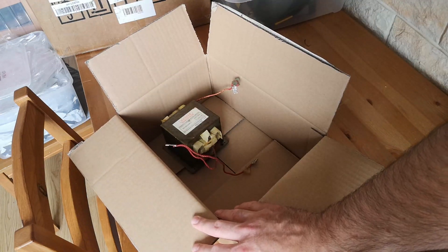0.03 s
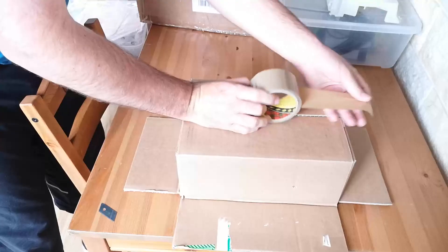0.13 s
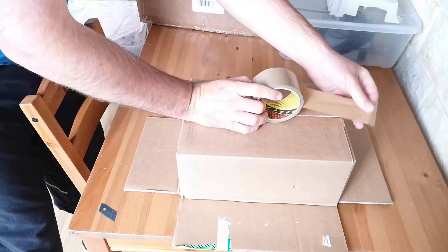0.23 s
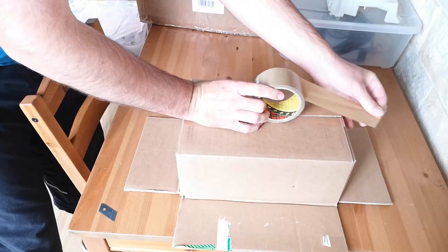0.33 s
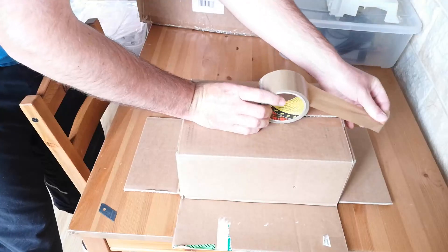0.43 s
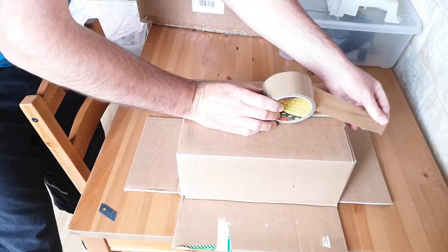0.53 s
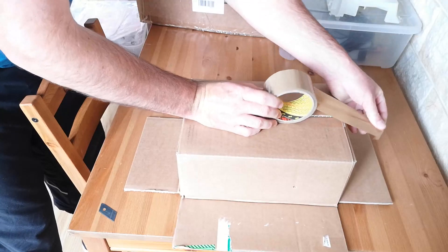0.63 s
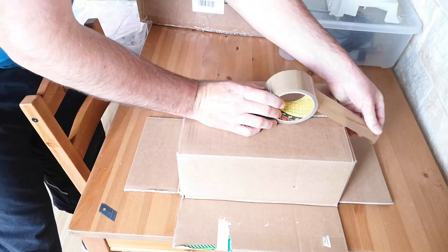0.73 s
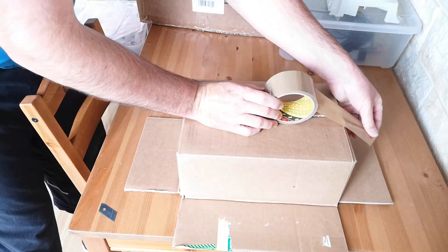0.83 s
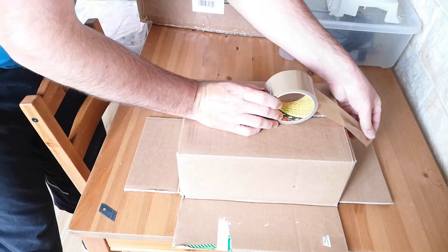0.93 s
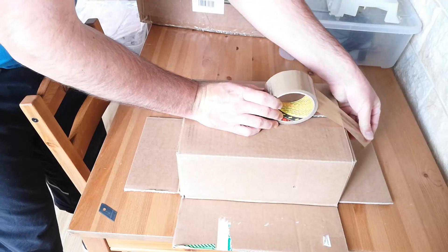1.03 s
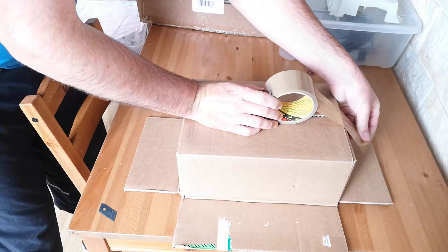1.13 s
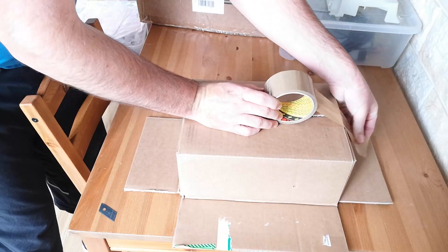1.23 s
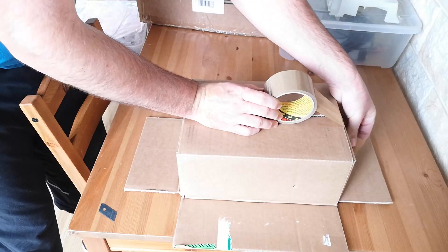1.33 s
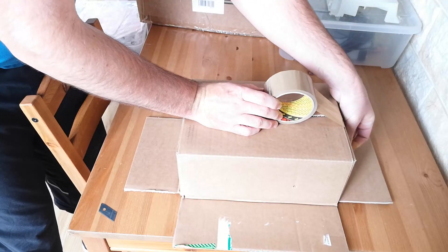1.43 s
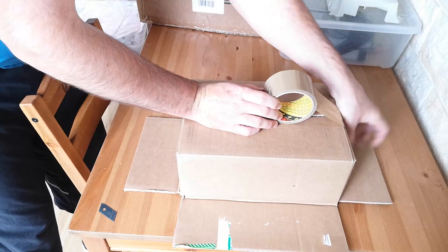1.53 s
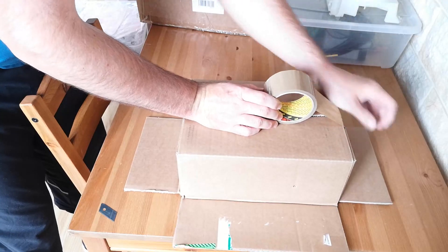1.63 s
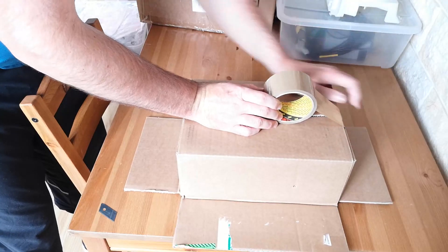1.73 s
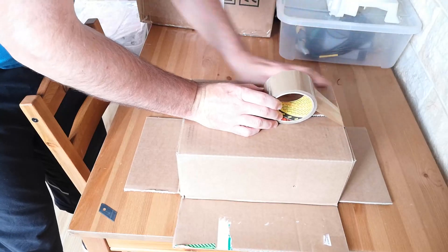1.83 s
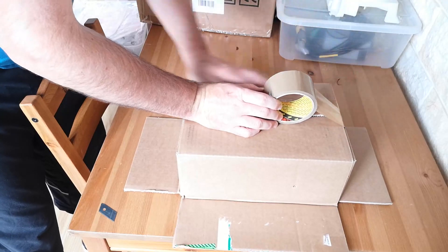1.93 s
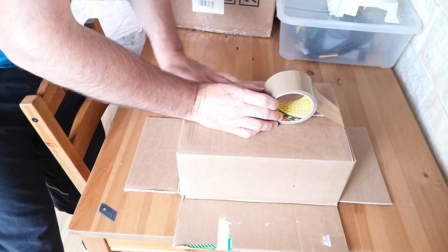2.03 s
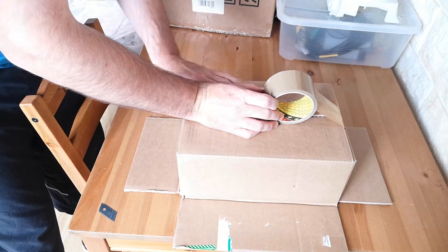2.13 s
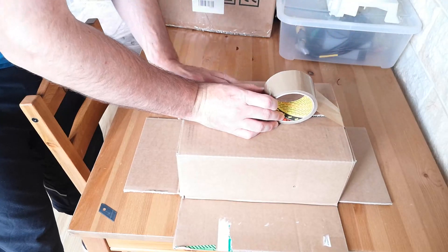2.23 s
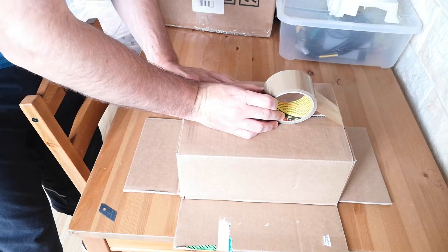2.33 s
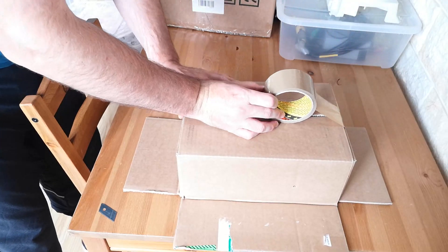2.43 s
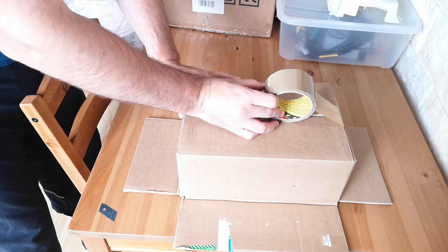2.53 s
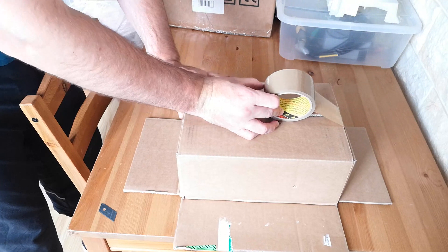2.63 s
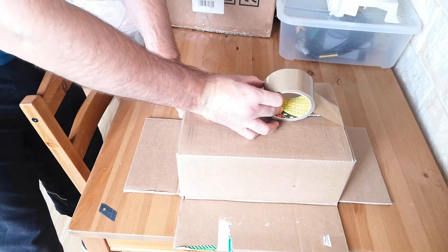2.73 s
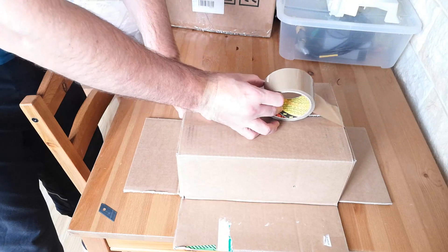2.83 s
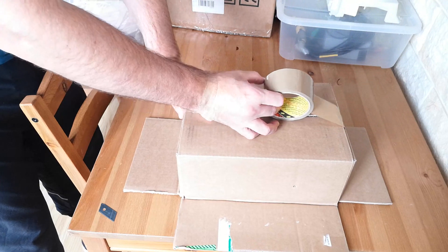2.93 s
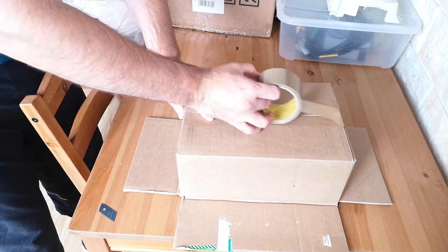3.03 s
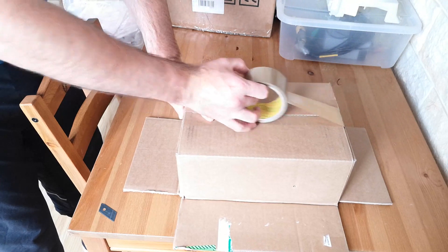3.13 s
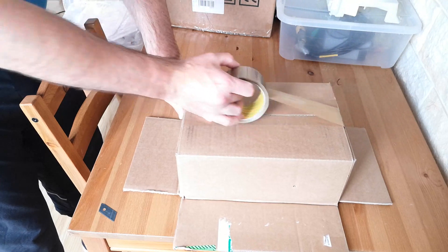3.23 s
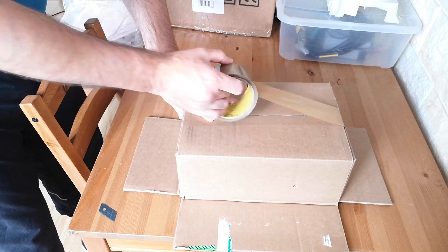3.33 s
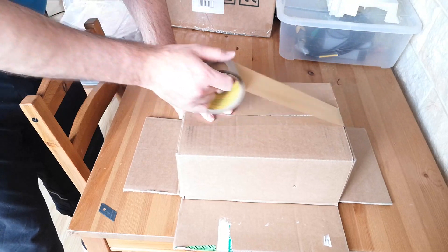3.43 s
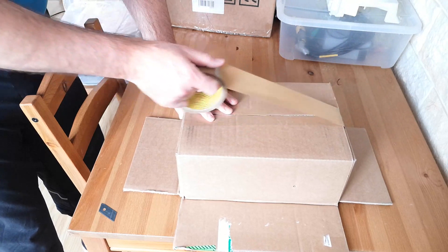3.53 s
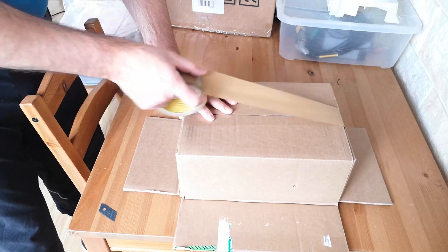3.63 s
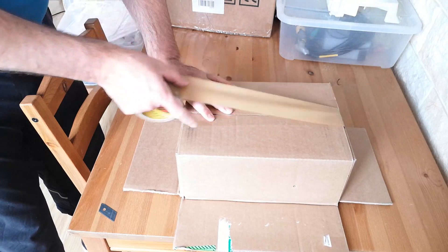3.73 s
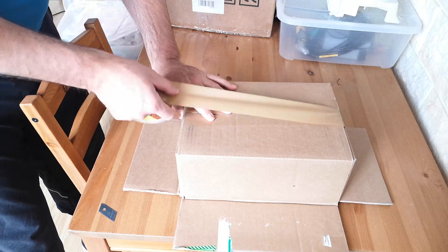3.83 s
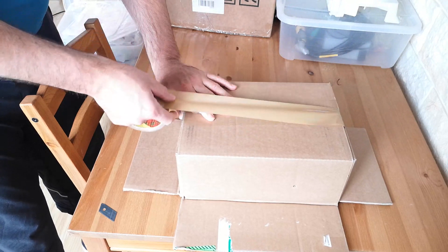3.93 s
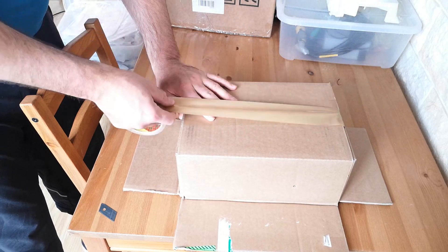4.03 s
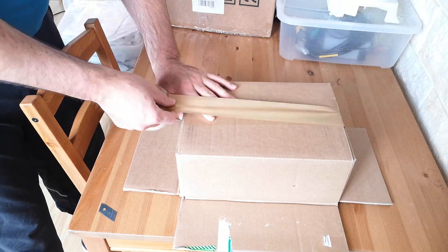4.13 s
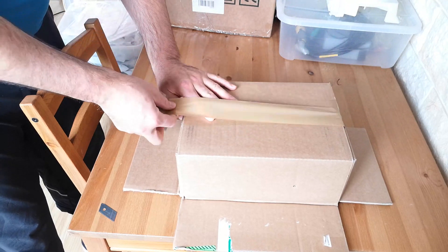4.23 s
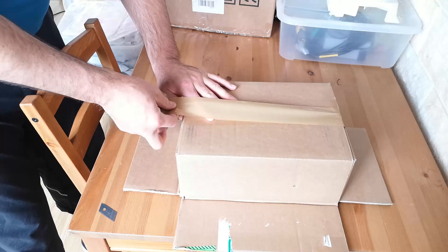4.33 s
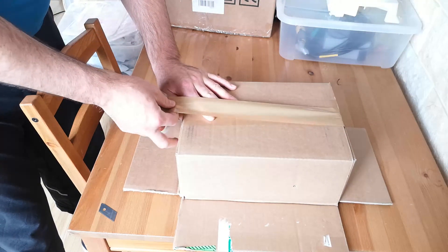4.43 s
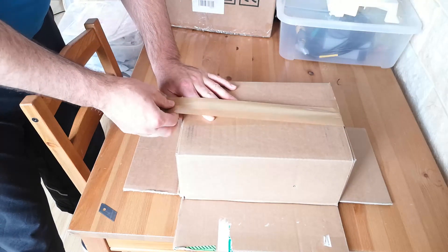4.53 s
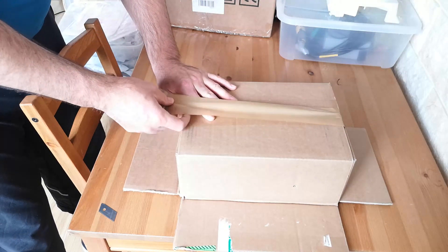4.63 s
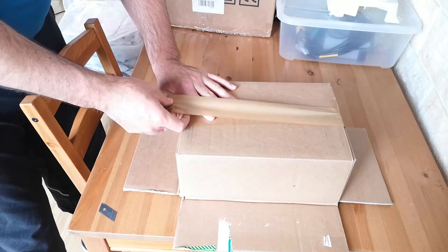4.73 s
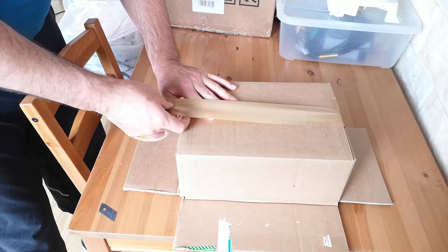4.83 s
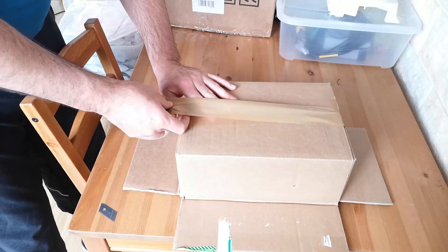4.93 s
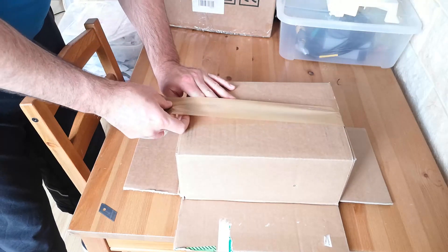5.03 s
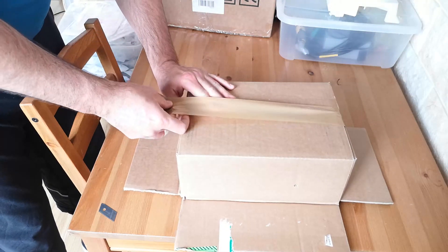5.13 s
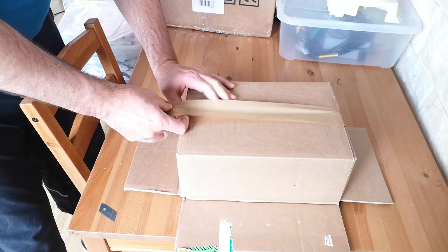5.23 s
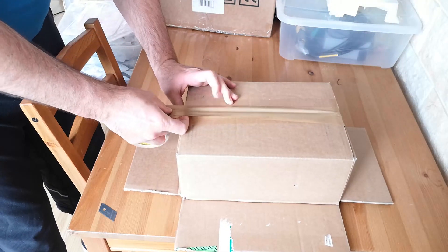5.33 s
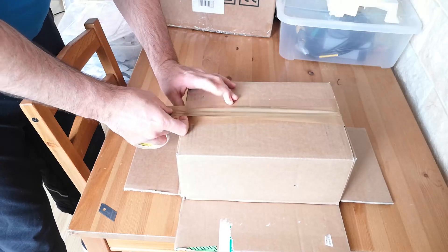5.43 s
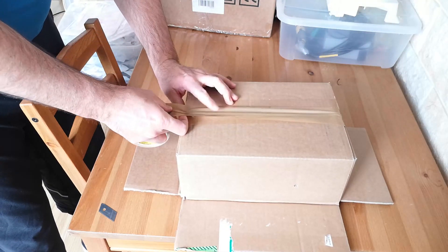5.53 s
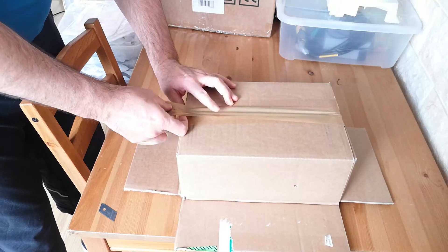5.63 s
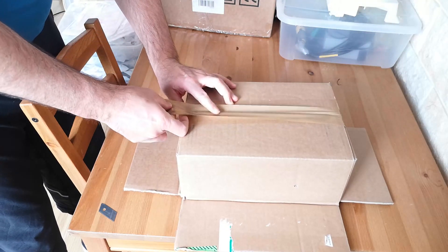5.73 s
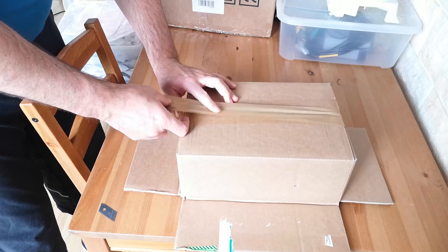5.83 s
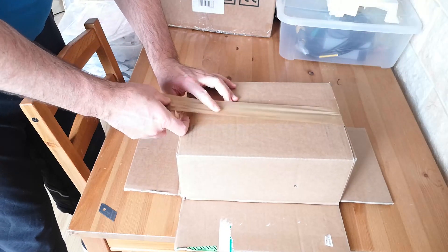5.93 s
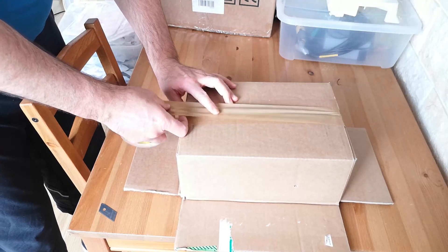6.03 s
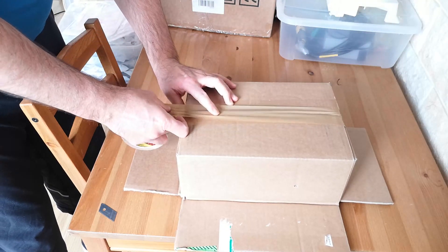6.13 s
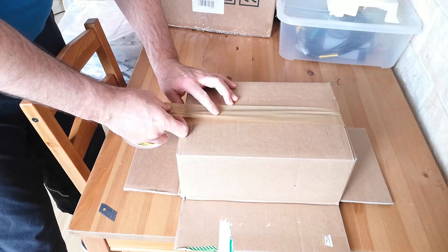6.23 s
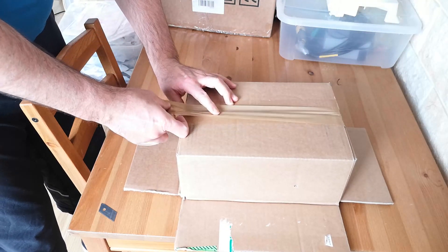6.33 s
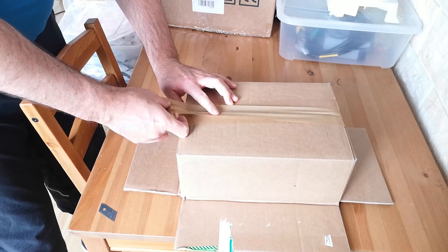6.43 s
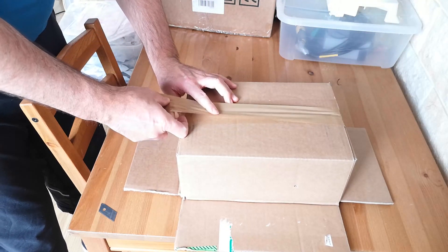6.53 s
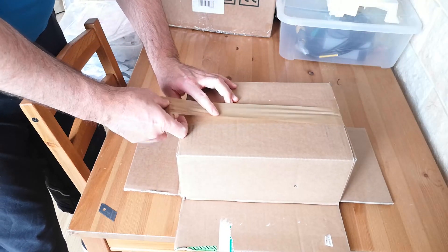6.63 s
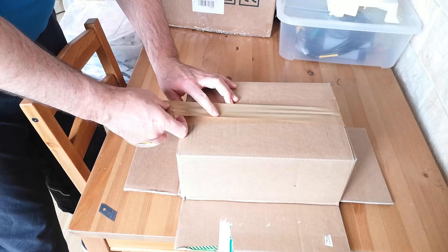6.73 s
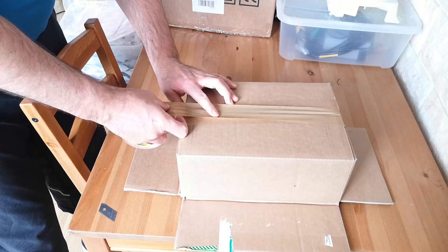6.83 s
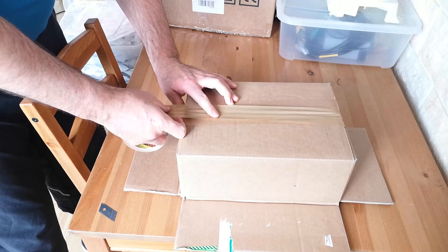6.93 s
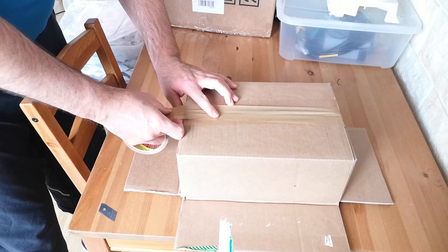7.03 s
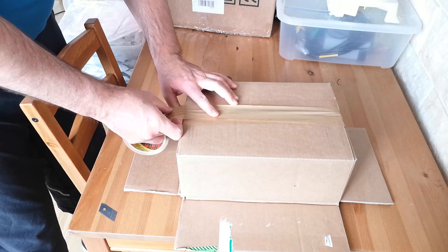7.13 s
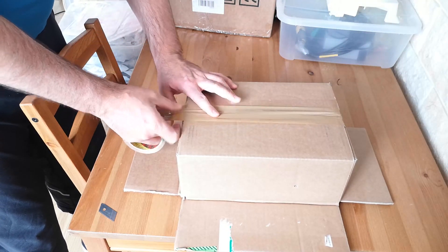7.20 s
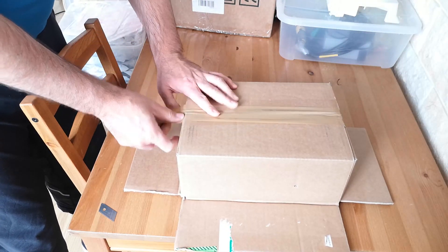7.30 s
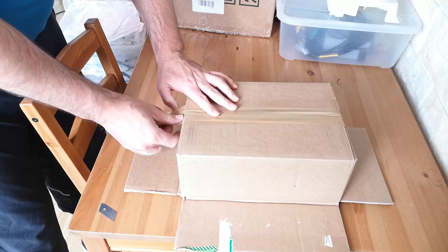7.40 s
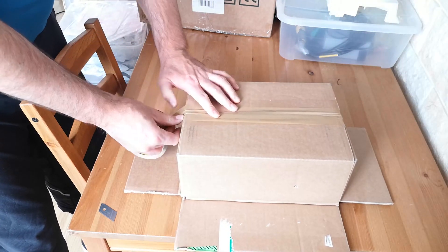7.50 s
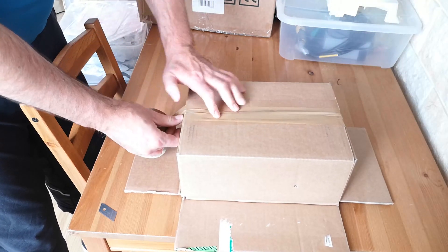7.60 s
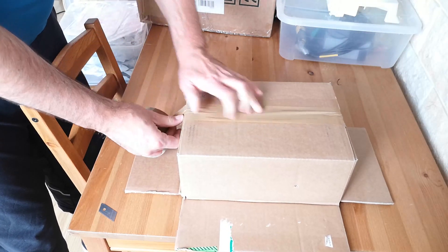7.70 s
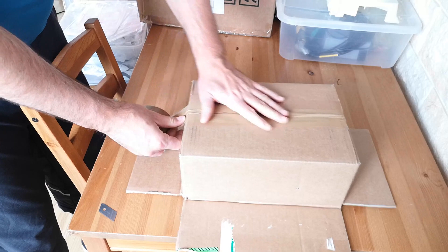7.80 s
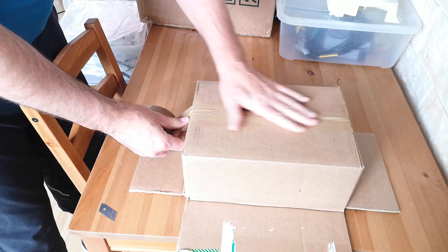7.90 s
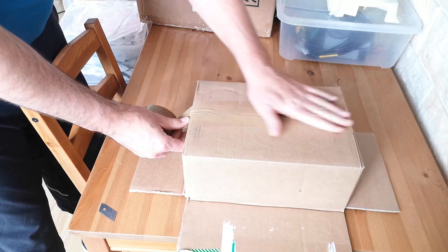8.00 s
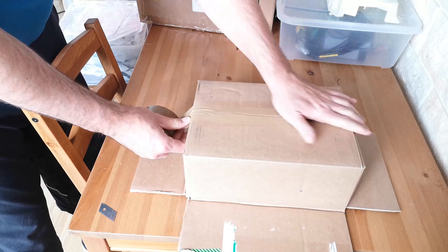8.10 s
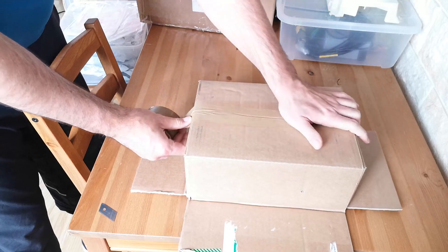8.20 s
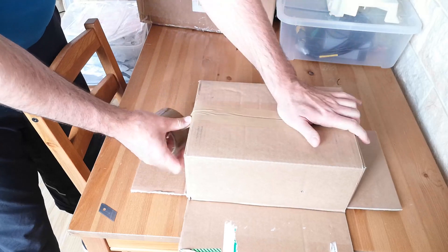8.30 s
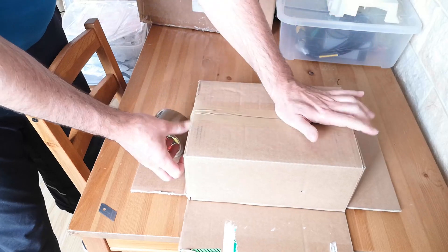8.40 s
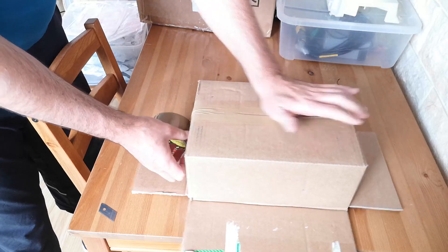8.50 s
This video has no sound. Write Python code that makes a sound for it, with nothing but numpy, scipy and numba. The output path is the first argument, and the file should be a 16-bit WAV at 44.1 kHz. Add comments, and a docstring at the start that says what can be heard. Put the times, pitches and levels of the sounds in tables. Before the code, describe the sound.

In a small, quiet, hard-walled room, packing tape jerks off its roll in short bright rips, then after a lull of rubbing and small knocks comes one long harsh, juddering peel of nearly a second. Crackling snaps follow as it is pressed onto a hollow cardboard box, with a fingertip squeak, thumps, another short rip and soft palm sweeps. Close microphone.

```python
"""Packing tape is pulled off its roll and pressed onto a cardboard box on a wooden table, in a small room.
The glue lets go by stick-slip: trains of tiny slips make the taut film sizzle, the card rattle and the
hollow box boom. Knocks ring the box's modes, a fingertip stutters and groans along the tape, and
friction noise is heard as a palm sweeps over the lid and the box shuffles on the table."""
import sys
import numpy as np
from scipy import signal
from scipy.fft import rfft, irfft
from scipy.io import wavfile
from scipy.ndimage import uniform_filter1d
from numba import njit

SR = 44100
rng = np.random.default_rng(int(sys.argv[2]) if len(sys.argv) > 2 else 0)


def bounce(signal):
    """Save signal as a 16-bit WAV file at the path given by the first command-line argument."""
    frames = np.transpose(np.atleast_2d(signal))
    limited = np.clip(frames, -1, 1)
    pcm = np.round(limited * 32767).astype(np.int16)
    wavfile.write(sys.argv[1], SR, pcm)


N = 377496
TIME = np.arange(N) / SR


def undb(db):
    """Definition of the decibel: level to amplitude gain."""
    return 10 ** (np.asarray(db) / 20)


def unit(x):
    """Normalisation to an rms of 1."""
    return x / np.sqrt(np.mean(x ** 2) + 1e-30)


def with_energy(x, db, seconds):
    """Equal energy: scale x to the energy of a sound that holds this level for so long."""
    return x * undb(db) * np.sqrt(seconds * SR / (np.sum(x ** 2) + 1e-30))


def ticks(seconds):
    """Sampling: the time axis of a short sound."""
    return np.arange(int(seconds * SR) + 1) / SR


def add(out, s, x):
    """Superposition: mix a sound in at a time in seconds."""
    i = int(s * SR)
    out[i:i + len(x)] += x[:max(len(out) - i, 0)]


def fader(s, db):
    """Amplitude envelope along a level curve, silent outside it."""
    return uniform_filter1d(undb(np.interp(TIME, s, db, left=-150, right=-150)), 256)


def stroke(s, length, db, rise, sag, fall):
    """Envelope of one gesture: it builds, sags while held and dies away, each at its rate in dB per second."""
    t = TIME - s
    building = rise * np.maximum(-t, 0)
    held = sag * np.clip(t, 0, length)
    dying = fall * np.maximum(t - length, 0)
    return undb(db - np.minimum(building + held + dying, 150))


def response(points, size=1024):
    """Minimum phase: causal impulse response of a colour, from the cepstrum of its log gain."""
    hz, db = np.transpose(points)
    f = np.maximum(np.arange(size // 2 + 1) * SR / size, 1)
    log_gain = np.log(undb(np.interp(np.log(f), np.log(hz), db)))
    cepstrum = irfft(log_gain)
    cepstrum[1:size // 2] *= 2  # fold negative times onto positive ones
    cepstrum[size // 2 + 1:] = 0
    return irfft(np.exp(rfft(cepstrum)))


def through(x, ring):
    """Linear filtering: convolve a whole track with an impulse response."""
    return signal.fftconvolve(x, ring)[:N]


@njit
def svf(x, hz, width):
    """Resonance: state-variable band-pass with a moving centre and a width relative to it."""
    y, b, l = np.empty(len(x)), 0., 0.
    for i in range(len(x)):
        g = np.tan(np.pi * hz[i] / SR)
        v = (b + g * (x[i] - l)) / (1 + g * (g + width))
        b, l, y[i] = 2 * v - b, l + 2 * g * v, width * v
    return y


def slips(size, rate, jitter, spread_db):
    """Stick-slip: pulses at uneven gaps and of uneven strength, the first one at once."""
    chance = rng.standard_normal((size // 6 + 2, 2))
    gaps = np.exp(jitter * chance[:, 0]) * SR / rate
    at = (np.cumsum(gaps) - gaps[0]).astype(int)
    strength = undb(spread_db * np.clip(chance[:, 1], -2, 2))
    strength[0] = undb(spread_db)
    inside = at < size
    return np.bincount(at[inside], strength[inside], size)


def fizz(pulses, life):
    """Shot noise: each pulse sets off noise whose amplitude decays with time constant life, in seconds."""
    power = signal.lfilter([1], [1, -np.exp(-2 / (life * SR))], pulses ** 2)
    return np.sqrt(power) * rng.standard_normal(len(pulses))


# Colour of the quiet floor. Each row: frequency in Hz, relative level in dB.
FLOOR_COLOUR = [(20, 3), (40, 7), (80, -4), (160, -3), (400, -11.5), (1000, -21), (4000, -27.5),
                (10000, -24.5), (16000, -32)]
FLOOR_DB = -75


def quiet_floor():
    """Stationary random noise, coloured by a fixed filter."""
    return unit(through(rng.standard_normal(N), response(FLOOR_COLOUR, size=4096))) * undb(FLOOR_DB)


# Diffuse field of the room. Each row: frequency in Hz, reverberation time t60 in seconds, echo level in dB.
ROOM_DECAY = [(100, 0.37, -3), (300, 0.46, -9), (800, 0.46, -4.5), (2000, 0.47, -4.5), (4670, 0.42, -3.5),
              (10000, 0.4, -6.5), (16000, 0.2, -6)]


def echoes():
    """Diffuse reverberation of a small hard room: noise decays exponentially, the top treble first."""
    hz, t60, db = np.transpose(ROOM_DECAY)
    t = np.arange(2 ** 15) / SR
    noise = rfft(rng.standard_normal(len(t)))
    log_f = np.log(np.maximum(np.arange(len(noise)) * SR / len(t), 1))
    build_up = np.clip((t - .002) / 0.0005, 0, 1)
    tail = 0
    for k, share in enumerate(np.eye(len(hz))):
        decay = build_up * np.exp(-np.log(1000) * t / t60[k])
        band = irfft(noise * np.interp(log_f, np.log(hz), share))
        tail = tail + undb(db[k]) * band * decay / np.sqrt(np.sum(decay ** 2))
    return tail


def room(x, count=4):
    """Source position: slips from ever different spots reach the walls along several sets of echo paths."""
    place = TIME * 160  # sets of paths passed per second, crossfaded in a circle
    out = x.copy()
    for k in range(count):
        distance = np.abs((place - k) % count - count / 2)
        out += through(x * np.cos(np.pi / 2 * np.minimum(distance, 1)), echoes())
    return out


# Colour of skin on card. Each row: frequency in Hz, relative level in dB.
SKIN_COLOUR = [(300, -40), (600, -53), (900, -16), (1400, -18), (3000, -13), (6000, -10), (10500, 5),
               (13000, -1.5), (16000, -4)]
# Strokes of the palm over the lid, and at 6.174 s a fingertip sliding on the tape. Each row: start in seconds,
# length in seconds, level at the start in dB.
SKIN_SWEEPS = [(1.58, 0.0076, -61), (1.778, 0.3, -49), (2.312, 0.038, -65), (2.58, 0.049, -62),
               (6.174, .05, -64.5), (7.804, 0.007, -52.5), (7.89, 0.14, -52.5), (8.076, 0.36, -57),
               (8.528, .02, -57)]
SWEEP_RATES = dict(rise=242, sag=13.5, fall=172)  # dB per second


def sweeping():
    """Friction noise: skin slips over many card fibres and hisses."""
    fibres = fizz(slips(N, rate=2700, jitter=0.73, spread_db=-3), life=0.0035)
    power = sum(stroke(s, length, db, **SWEEP_RATES) ** 2 for s, length, db in SKIN_SWEEPS)
    return unit(through(fibres, response(SKIN_COLOUR))) * np.sqrt(power)


# The box shuffling under the hands, and at 6.168 s a fingertip rubbing on the tape. Each row: start in #
# seconds, length in seconds, level at the start in dB, centre frequency in Hz.
BOX_SHUFFLES = [(1.874, 0.015, -72, 936), (2.054, 0.06, -67, 170), (2.212, 0.22, -73.5, 300),
                (2.755, 0.015, -67.5, 200), (6.168, 0.028, -66, 1310), (7.21, 0.058, -68.5, 500),
                (7.835, 0.069, -61.5, 130), (7.9, 0.096, -65, 326), (8.187, 0.056, -64.5, 337),
                (8.399, 0.083, -60, 100), (8.527, .03, -69, 170)]
SHUFFLE_RATES = dict(rise=343, sag=22, fall=207)  # dB per second


def shuffling(bodies):
    """Friction-driven modes: the box scuffs on the table and its panels answer; a brief fingertip rub on the
    tape is shaped the same way."""
    boxes = bodies[2]
    friction = fizz(slips(N, rate=510, jitter=0.94, spread_db=4.5), life=0.0033)
    # the modes stand out of a broad scuffing
    panels = unit(through(friction, boxes[1])) + 3.5 * unit(friction)
    out = np.zeros(N)
    for s, length, db, hz in BOX_SHUFFLES:
        push = stroke(s, length, db, **SHUFFLE_RATES)
        out += unit(svf(panels, np.full(N, float(hz)), 1.2)) * push
    return out


# Panels and cavity of the box. Each row: mode frequency in Hz, mean level in dB, t60 in seconds at damping 1.
BOX_MODES = [(65.7, -3.5, 0.14), (100, -1.5, 0.062), (146, 1.5, 0.18), (170, -2.5, 0.12), (199, 3, 0.1),
             (250, -10, 0.24), (311, -6, 0.051), (340.4, 1, 0.13), (380, -1, 0.12), (418, -6, 0.11),
             (461, -7.5, 0.13), (533, -7.5, 0.16), (634, -9, 0.061), (697, -3, 0.17), (795.5, -2.5, 0.16),
             (913, 0, 0.056), (1140, -6, 0.049), (1230, -8.5, 0.056), (1384, 2.5, 0.053)]


def box_ring(damping=1.0):
    """Modal synthesis: decaying sines, weighted anew for each place of contact."""
    hz, db, t60 = np.transpose(BOX_MODES)[:, :, None]
    t = ticks(.16)
    weight = undb(db + 4.3 * rng.standard_normal(hz.shape)) * rng.choice([-1, 1], hz.shape)
    decay = np.exp(-np.log(1000) * damping * t / t60)
    return np.sum(weight * np.sin(2 * np.pi * hz * t) * decay, axis=0)


def focus(ring, hz, span=1.57):
    """Mode selection by place of contact: low in the middle of a panel, high near a stiff corner."""
    low, high = hz / span, hz * span
    colour = [(low / 2, -16), (low, 0), (high, 0), (high * 2.04, -14), (high * 7, -38)]
    return signal.fftconvolve(ring, response(colour, size=2048))


# Knocks on the box, from a hand or a tug of the tape. Each row: start in seconds, level in dB over 10 ms,
# centre of the box's answer in Hz, edge rattle in dB over 10 ms.
BOX_KNOCKS = [(1.503, -50, 1290, -48.5), (1.509, -44.5, 350, -49), (1.526, -44.5, 560, -45),
              (1.567, -53, 300, -50.5), (2.024, -60, 114, -71), (2.124, -63.5, 900, -61),
              (2.668, -60, 250, -55.5), (4.644, -49, 510, -43), (5.874, -41, 900, -67),
              (6.557, -39, 950, -53.5), (6.624, -46, 199, -59), (7.069, -67, 666, -68),
              (7.285, -55, 193, -62), (7.36, -41.5, 750, -34.5), (7.791, -41.5, 137, -52.5),
              (8.39, -59, 74.4, -54.5), (8.447, -57, 90, -62)]


def knocking(bodies):
    """Impact excitation: a knock rings the box's modes and a noise burst rattles the cut edge."""
    film, card, _ = bodies
    out, t = np.zeros(N), ticks(0.014)
    edge = card + 1.38 * film
    for s, db, box_hz, rattle_db in BOX_KNOCKS:
        add(out, s, with_energy(focus(box_ring(damping=1.15), box_hz), db, 1 / 100))
        rattle = rng.standard_normal(len(t)) * np.exp(-t / 0.017)
        add(out, s, with_energy(signal.fftconvolve(rattle, edge), rattle_db, 1 / 100))
    return out


# Fingertip dragged along the taped seam. Each row: time in seconds, card level in dB, film relative to
# card in dB, box relative to card in dB.
FINGER_DRAG = [(5.031, -59, 3, 6), (5.045, -53, -1, -5), (5.135, -51.5, 3, -11), (5.2, -54, 8, -5),
               (5.24, -44.5, 10, -21), (5.325, -50, -2.5, -7.5), (5.355, -46.5, 7, -3),
               (5.38, -66, 11.5, 6), (5.45, -81, -7, -10)]
# Groan of the slowing fingertip. Each row: time in seconds, pitch in Hz, level in dB.
FINGER_GROAN = [(5.2, 2970, -54), (5.24, 2510, -47), (5.275, 2000, -55), (5.306, 563, -55.5),
                (5.355, 480, -51.5), (5.39, 383, -68)]


def dragging(bodies):
    """Stick-slip friction: a fingertip stutters along the seam and groans lower as it comes to rest."""
    film, card, boxes = bodies
    s, card_db, film_db, box_db = np.transpose(FINGER_DRAG)
    pulses = slips(N, rate=540, jitter=.7, spread_db=2.5)
    grit = fizz(pulses, life=0.0039)
    out = unit(through(grit, card)) * fader(s, card_db)
    out += unit(through(grit, film)) * fader(s, card_db + film_db)
    out += unit(through(pulses, focus(boxes[0], hz=420))) * fader(s, card_db + box_db)
    s, pitch, db = np.transpose(FINGER_GROAN)
    hz = np.interp(TIME, s, pitch)
    groan = svf(svf(grit, hz, 0.92), hz, 0.92) / np.sqrt(hz)  # even out the growing bandwidth
    return out + unit(groan) * fader(s, db)


# Colour of the taut film. Each row: frequency in Hz, relative level in dB.
FILM_COLOUR = [(1500, -32), (3500, -18), (5000, -15.5), (7000, -8.5), (8500, -5), (9700, 0), (10600, 2.5),
               (11500, 0.5), (12500, -3), (14000, -5), (16000, -10.5)]
# Mean colour of the card. Each row: frequency in Hz, relative level in dB.
CARD_COLOUR = [(250, -16), (550, -4.5), (800, -1), (930, 0.5), (1250, -3), (1500, -1.5), (1780, 0.5),
               (2080, -2), (2330, 0.2), (3000, -2), (4300, -0.5), (6000, -4), (10000, -55.5)]


def taped_box():
    """Linear radiators: impulse responses of film and card, and of the box at eight places of contact."""
    boxes = [box_ring(damping=1.28) for _ in range(8)]
    return response(FILM_COLOUR), response(CARD_COLOUR), boxes


def radiate(pulses, bodies, film_db, card_db, box_db, box_hz, span, seconds):
    """Source and radiator: one train of slips is heard from the film, the card and the hollow box."""
    film, _, boxes = bodies
    box = focus(boxes[rng.integers(len(boxes))], box_hz, span)
    # every tug pulls at another spot of the card and favours other resonances
    hz, db = np.transpose(CARD_COLOUR)
    card = response(np.column_stack([hz, db + 1.85 * rng.standard_normal(len(hz))]))
    pulses = np.pad(pulses, (0, 1024))
    # a sharp crack, then a brief flutter running along the strip
    crack = 1.5 * pulses + fizz(pulses, life=.0005)
    flutter = fizz(pulses, life=0.012)
    film_force = crack + 0.18 * flutter
    card_force = fizz(pulses, life=0.00064) + 0.31 * fizz(pulses, life=.007)
    paths = [(film_force, film, film_db),
             (card_force, card, film_db + card_db),
             (pulses, box, film_db + box_db)]
    out = np.zeros(len(pulses) + len(box))
    for force, ring, db in paths:
        add(out, 0, with_energy(signal.fftconvolve(force, ring), db, seconds))
    return out


SNAP_BOX_DB, SNAP_BOX_SHARE = -17.5, 0.44  # the box's boom grows with a share of the card's dB


def snap(bodies, length, film_db, card_db):
    """Sudden release: a patch of glue gives way at once, and smaller slips run on behind it."""
    t = ticks(3.5 * length)
    pulses = np.exp(-(t / (1.68 * length)) ** 2) * slips(len(t), rate=750, jitter=.6, spread_db=1.0)
    box_db = SNAP_BOX_DB + SNAP_BOX_SHARE * card_db
    return radiate(pulses, bodies, film_db, card_db, box_db, box_hz=408, span=1.97, seconds=1 / 100)


# Tape sitting under strain. Each row: start in seconds, end in seconds, mean film level of a tick in dB
# over 10 ms.
HELD_STRAINS = [(0.517, 0.718, -60.5), (.85, 1, -73), (1.386, 1.48, -68.5), (4.28, 4.38, -66.5),
                (6.975, 7.05, -65.5)]
CREEP_DB = -34  # relative to the jerk or snap
CREEP_RISE, CREEP_FALL = 696, 101.5  # dB per second
TICKS_PER_S, TICK_SPREAD_DB, TICK_S, TICK_CARD_DB = 14, 2.5, .002, -10.5  # card relative to film
STRAIN_FIZZ_DB = -9.5  # relative to a tick


def creeping(bodies):
    """Creep: strained glue fizzes faintly around each release, and lone threads tick at uneven moments."""
    film, card, _ = bodies
    s, _, db = np.transpose([row[:3] for row in TAPE_PULLS + TAPE_SNAPS])[:, :, None]
    grid = TIME[::128]
    slope = np.maximum(CREEP_RISE * (s - grid), CREEP_FALL * (grid - s))
    release_db = np.max(db - slope, axis=0)
    strain, out = fader(grid, release_db + CREEP_DB), np.zeros(N)
    for start, end, tick_db in HELD_STRAINS:
        held = stroke(start, end - start, tick_db + STRAIN_FIZZ_DB, CREEP_RISE, 0, CREEP_FALL)
        strain = np.maximum(strain, held)
        # one tick somewhere in the first half of each slot
        for slot in np.arange(start, end, 1 / TICKS_PER_S):
            film_db = tick_db + TICK_SPREAD_DB * rng.standard_normal()
            tick = snap(bodies, TICK_S, film_db, TICK_CARD_DB)
            add(out, slot + rng.random() / TICKS_PER_S / 2, tick)
    threads = fizz(slips(N, rate=900, jitter=.7, spread_db=2.0), life=.002)
    return out + unit(through(threads, film + 0.34 * card)) * strain


# Snaps of the stretched tape. Each row: start in seconds, nominal length in seconds, film level in dB over
# 10 ms, card relative to film in dB.
TAPE_SNAPS = [(0.08, .011, -56, -12), (.1, 0.012, -26.5, -23.5), (0.444, .0033, -31, -14),
              (.46, 0.0031, -33.5, -31), (1.026, 0.0022, -57.5, -31), (1.048, 0.0093, -62, -32),
              (1.188, 0.011, -37.5, -14.5), (1.597, 0.0043, -49, -14), (2.425, 0.003, -36.5, -9.5),
              (2.45, 0.0012, -34, -23), (2.666, 0.0033, -47, -14.5), (2.701, 0.0042, -47.5, -14),
              (2.978, 0.014, -64.5, -6), (3.021, 0.00085, -31.5, -21), (3.026, .001, -35, -21),
              (3.033, 0.0013, -30, -22), (4.183, 0.0011, -35, -18.5), (4.555, 0.024, -48.5, -20),
              (4.644, 0.0044, -26.5, -22), (4.669, 0.0084, -25.5, -34), (4.763, 0.0008, -33, -22.5),
              (4.782, 0.0047, -38, -21), (4.899, 0.002, -43, -21), (5.03, 0.017, -39, -13),
              (5.08, 0.0023, -38.5, -12), (5.104, 0.0018, -39, -11), (5.128, 0.0087, -36, -6),
              (5.502, .0039, -44, -15.5), (5.564, 0.0094, -29, -17.5), (5.625, 0.0053, -33, -13),
              (5.69, 0.023, -42, -14), (5.707, 0.009, -25.5, -13.5), (5.796, 0.0016, -39.5, -14),
              (5.8265, 0.0021, -32.5, -10.5), (5.87, 0.0077, -22.5, -12.5), (5.914, 0.0056, -32, -18),
              (6.3, 0.0012, -50, -11), (6.353, 0.0033, -46, -11), (6.367, 0.0035, -42, -15),
              (6.389, .0027, -34.5, -10.5), (6.453, 0.0022, -33, -13.5), (6.556, 0.0018, -22, -12.5),
              (6.618, .012, -27.5, -16), (6.949, 0.004, -55.5, -43.5), (7.075, 0.0022, -40, -20.5),
              (7.09, 0.0046, -40.5, -18.5), (7.238, 0.015, -45, -6), (7.404, 0.0068, -36, -20),
              (7.515, 0.0017, -33, -19), (7.518, 0.023, -32.5, -15.5), (7.891, .0015, -43, -13.5),
              (7.931, 0.0036, -51, -3), (8.119, 0.0028, -51, -28), (8.168, 0.0025, -50.5, -40),
              (8.199, 0.0038, -46.5, -36), (8.243, 0.0029, -47, -17), (8.278, 0.00088, -52, -35),
              (8.304, .001, -50, -17), (8.539, 0.012, -41.5, -11.5)]


def snapping(bodies):
    """Release of stored strain: the tape snaps as it is stretched and pressed down."""
    out = np.zeros(N)
    for s, length, film_db, card_db in TAPE_SNAPS:
        add(out, s, snap(bodies, length, film_db, card_db))
    return out


# Tape unwinding in jerks. Each row: start in seconds, length in seconds, film level in dB, card relative to
# film in dB, box relative to film in dB.
TAPE_PULLS = [(.139, 0.019, -25, -20.5, -37.5), (0.169, 0.06, -25, -17.5, -33.5),
              (0.332, 0.016, -21.5, -16, -27), (.372, 0.0076, -26.5, -9.5, -24),
              (3.043, .1, -28, -15.5, -25), (3.156, 0.16, -26.5, -14, -19.5),
              (3.335, 0.079, -27.5, -12.5, -18), (3.437, 0.022, -24.5, -13, -19),
              (3.493, .16, -27.5, -11.5, -19.5), (3.668, 0.02, -23, -12.5, -18),
              (3.725, 0.08, -26.5, -12, -19.5), (3.816, 0.092, -25, -15.5, -24.5),
              (3.926, 0.048, -26, -20, -27), (4.006, 0.046, -29.5, -18.5, -26),
              (7.26, 0.051, -39, -10, -15), (7.284, .042, -30, -15.5, -21.5),
              (7.35, 0.025, -23, -15, -26.5)]
# The strip tugs at other parts of the lid. Each row: time in seconds, centre of the box's answer in Hz.
STRIP_TUG = [(.4, 199), (3.2, 374), (3.5, 285), (7.3, 210)]
PULL_STOP_S = 0.0051  # time constant at the end of a jerk
# the strip rings while it is held most taut; the width of each filter pass is relative to the pitch
TAUT_S, TAUT_LENGTH_S, TAUT_HZ, TAUT_WIDTH, TAUT_DB = 3.49, 0.21, 1680, 0.28, -50


def unwinding(bodies):
    """Stick-slip peeling: the peel line judders for as long as each jerk lasts; pulled tight, the strip rings."""
    out = np.zeros(N)
    for s, length, film_db, card_db, box_db in TAPE_PULLS:
        t = ticks(length + 0.054)
        tension = np.exp(-np.maximum(t - length, 0) / PULL_STOP_S)
        pulses = tension * slips(len(t), rate=450, jitter=.5, spread_db=1.0)
        box_hz = np.interp(s, *np.transpose(STRIP_TUG))
        add(out, s, radiate(pulses, bodies, film_db, card_db, box_db, box_hz, span=1.56, seconds=length))
    taut = stroke(TAUT_S, TAUT_LENGTH_S, 0, rise=53, sag=5, fall=53)
    hz = np.full(N, float(TAUT_HZ))
    ring = svf(svf(out * taut, hz, TAUT_WIDTH), hz, TAUT_WIDTH)
    return out + with_energy(ring, TAUT_DB, TAUT_LENGTH_S)


def scene():
    """Superposition: all the handwork in the room, over a quiet floor."""
    bodies = taped_box()
    hands = sweeping() + shuffling(bodies) + knocking(bodies) + dragging(bodies)
    tape = creeping(bodies) + snapping(bodies) + unwinding(bodies)
    return (room(hands + tape) + quiet_floor())[None]


def record(dry):
    """Saturation and band limit: the microphone rounds the loudest peaks; the top is cut."""
    ceiling = .14
    rounded = ceiling * np.tanh(dry / ceiling)
    low_pass = signal.ellip(10, .2, 70, 15950, fs=SR, output="sos")  # edge in Hz
    return signal.sosfilt(low_pass, rounded)


dry = scene()
out = record(dry)
bounce(out)
```